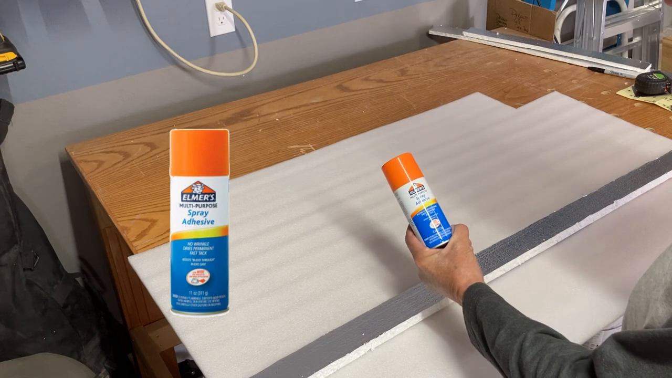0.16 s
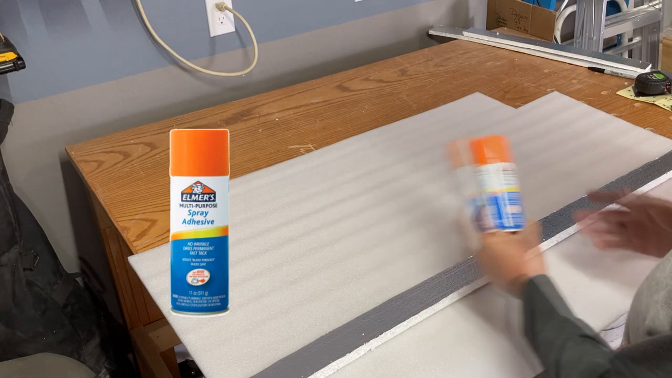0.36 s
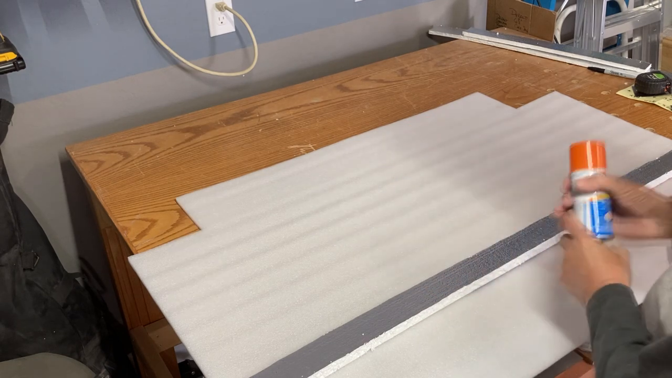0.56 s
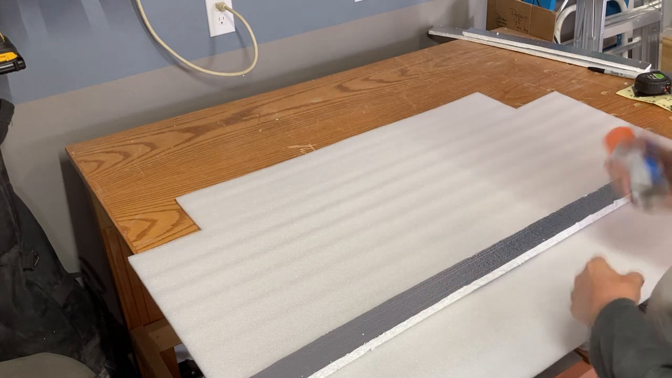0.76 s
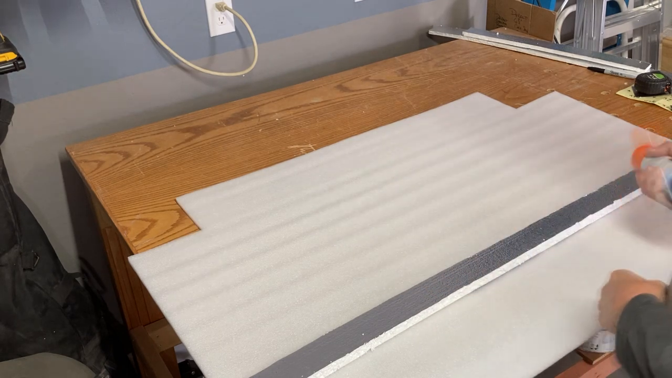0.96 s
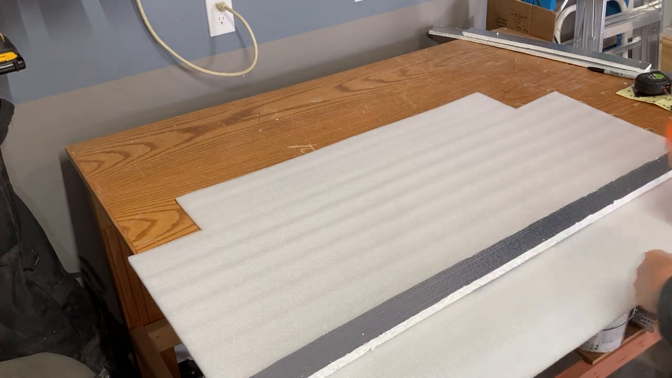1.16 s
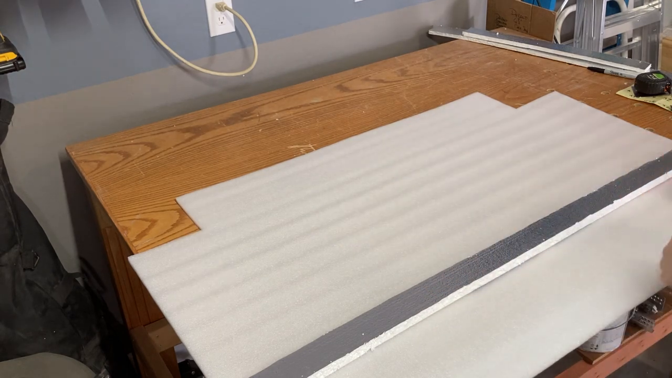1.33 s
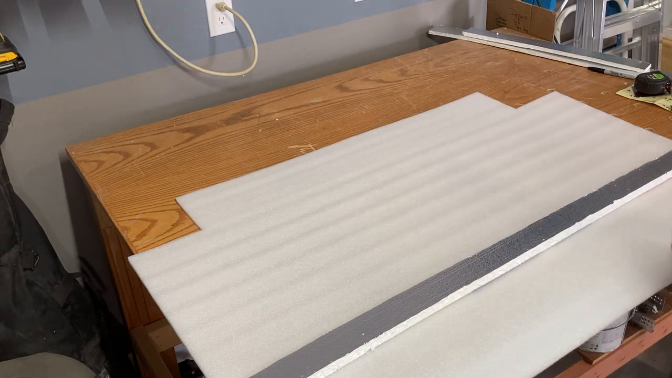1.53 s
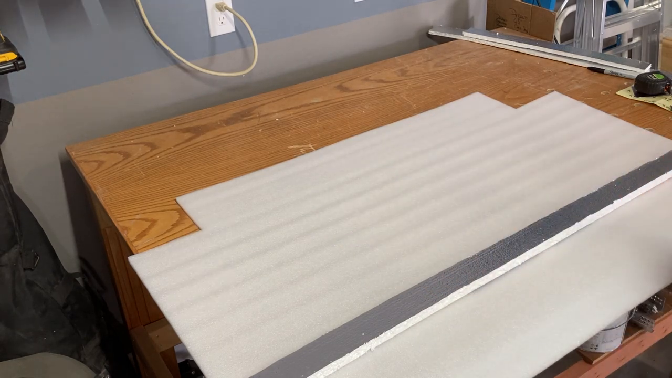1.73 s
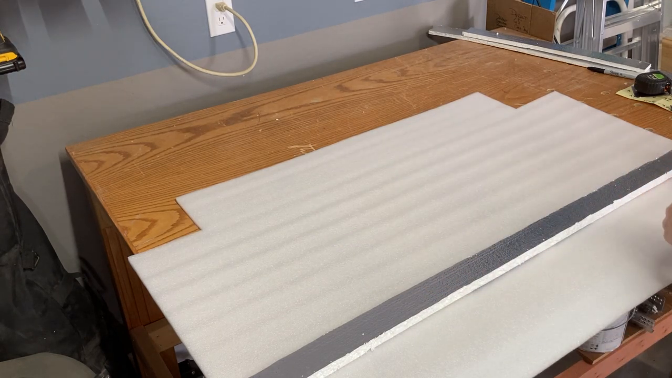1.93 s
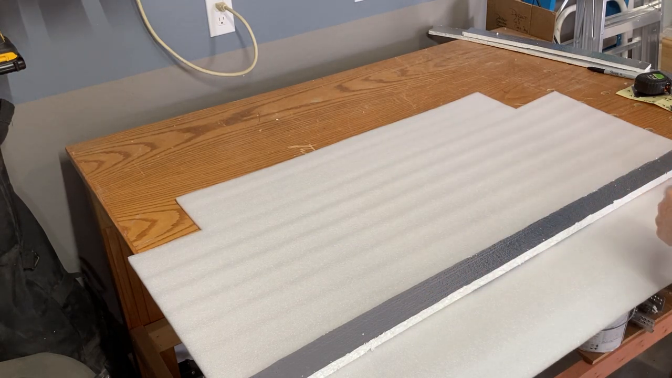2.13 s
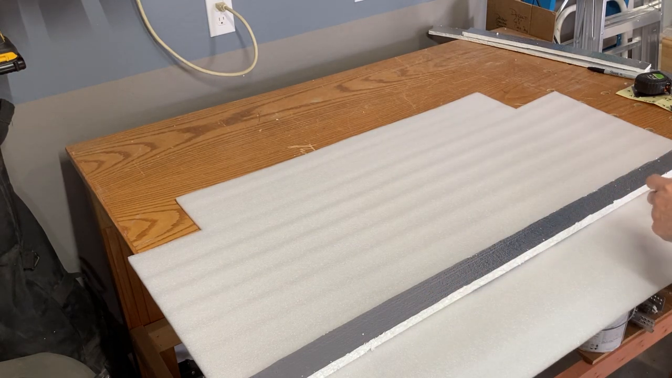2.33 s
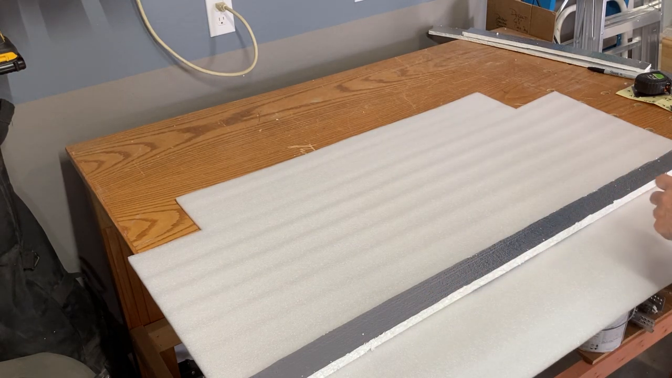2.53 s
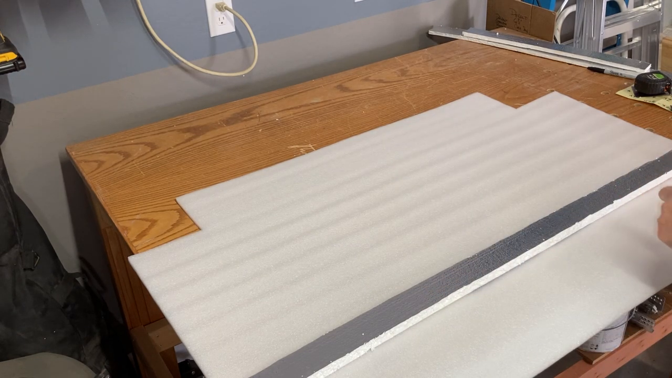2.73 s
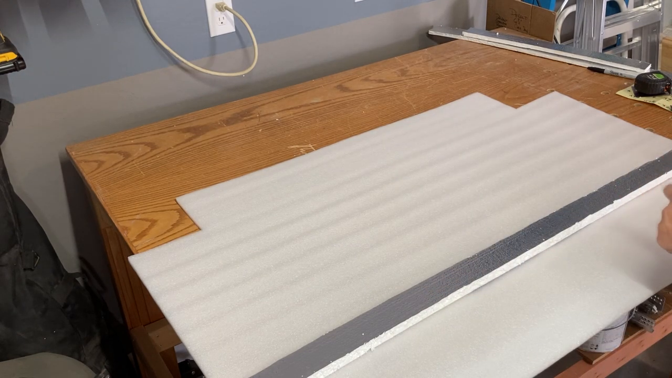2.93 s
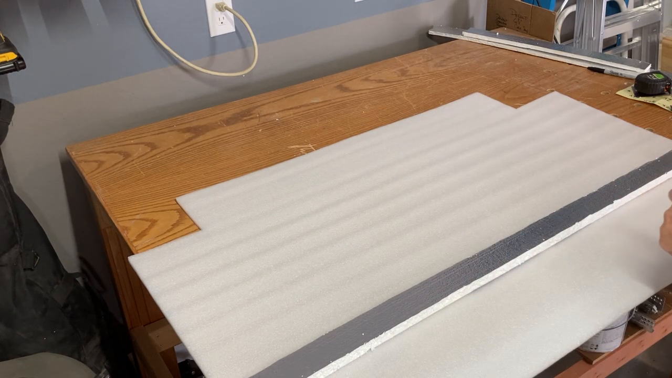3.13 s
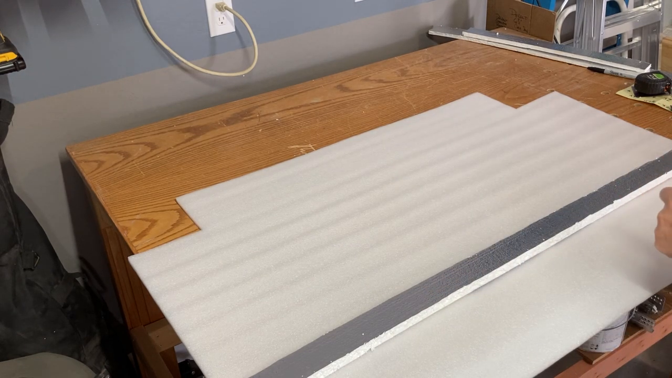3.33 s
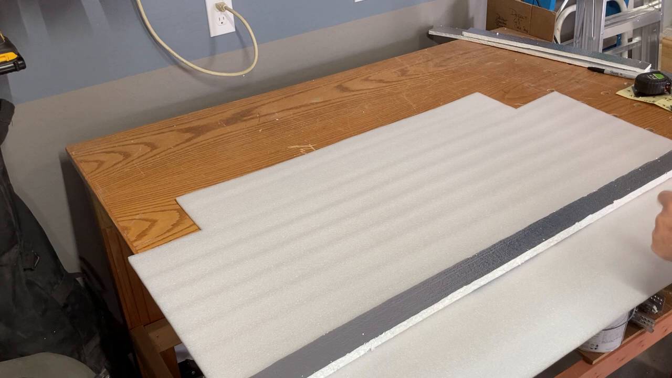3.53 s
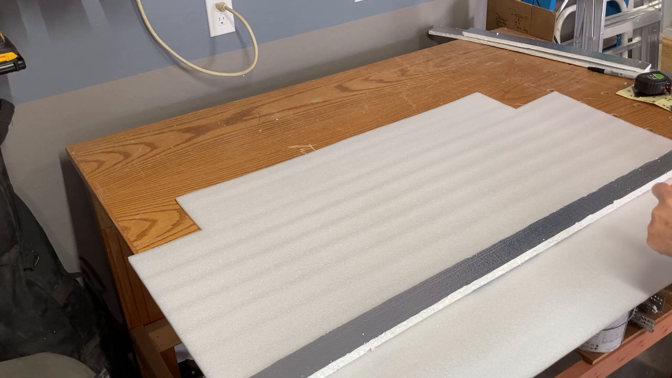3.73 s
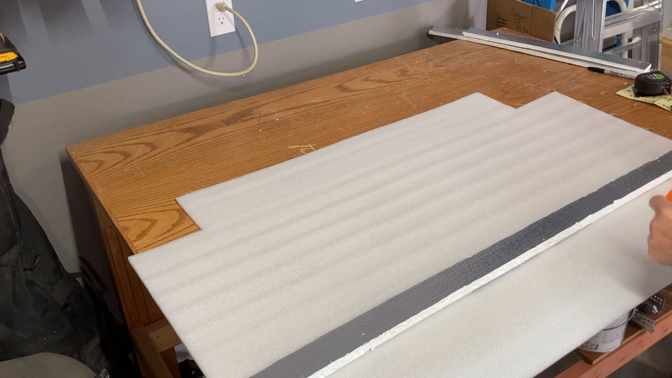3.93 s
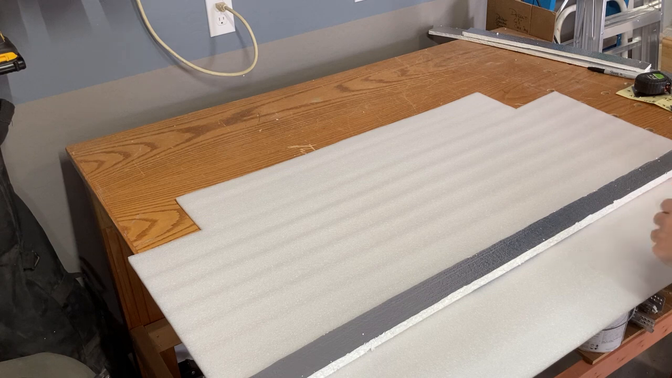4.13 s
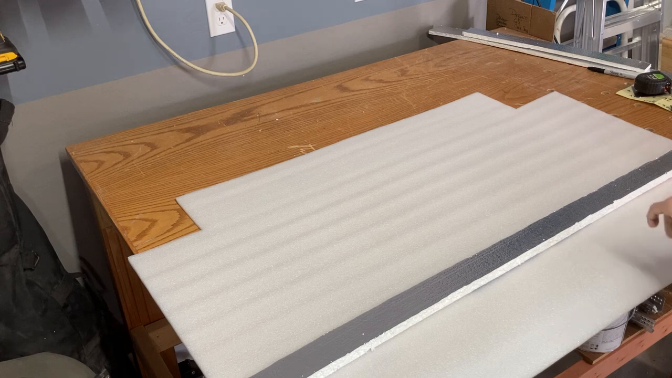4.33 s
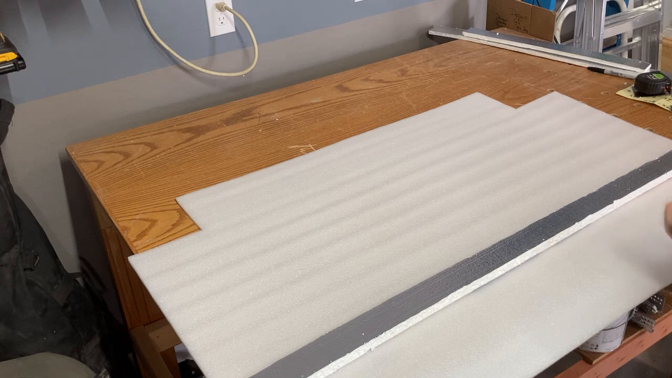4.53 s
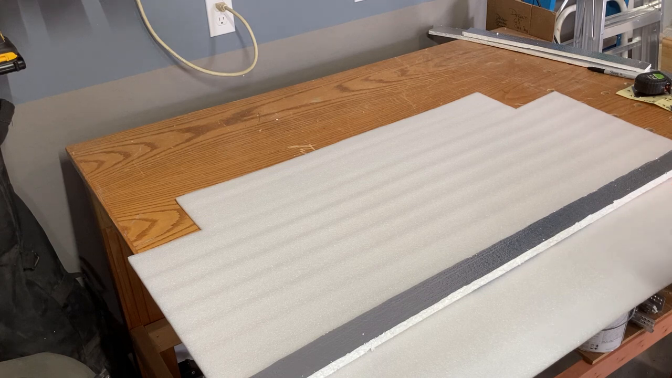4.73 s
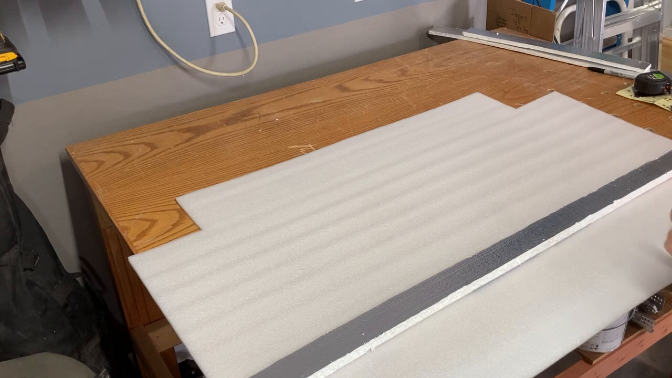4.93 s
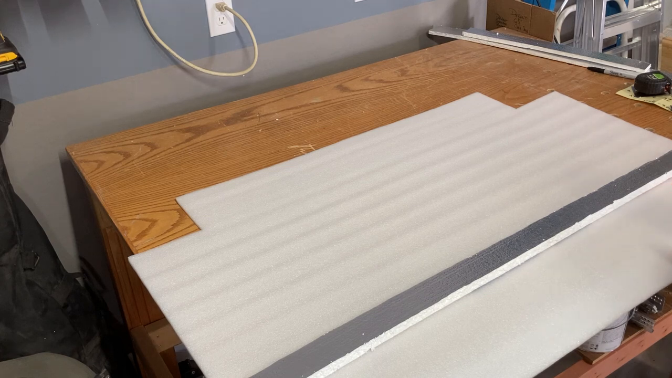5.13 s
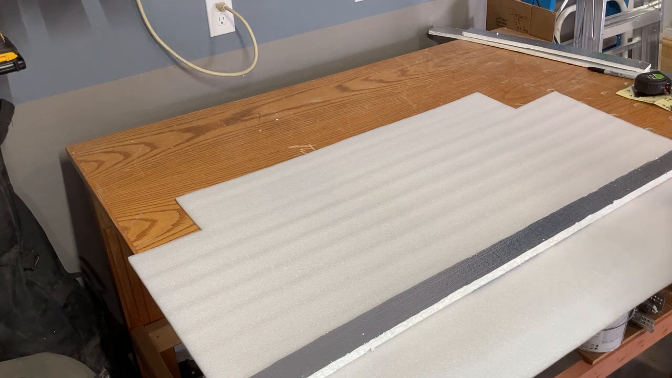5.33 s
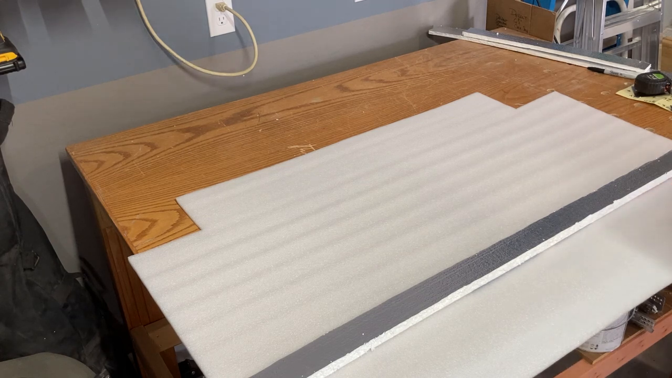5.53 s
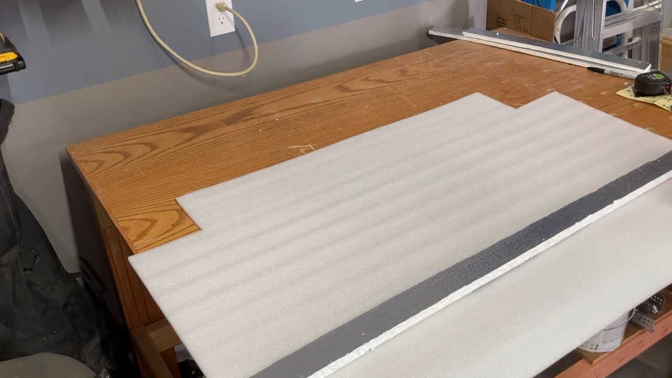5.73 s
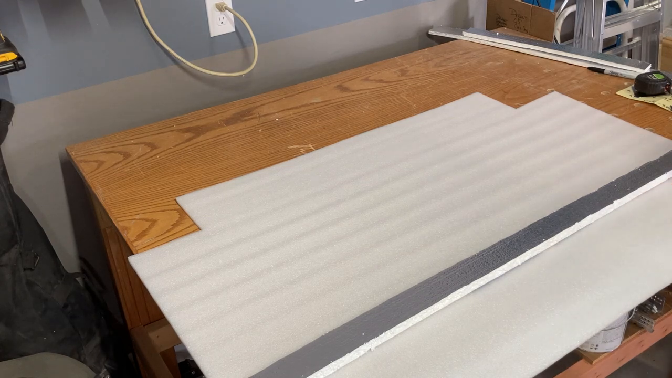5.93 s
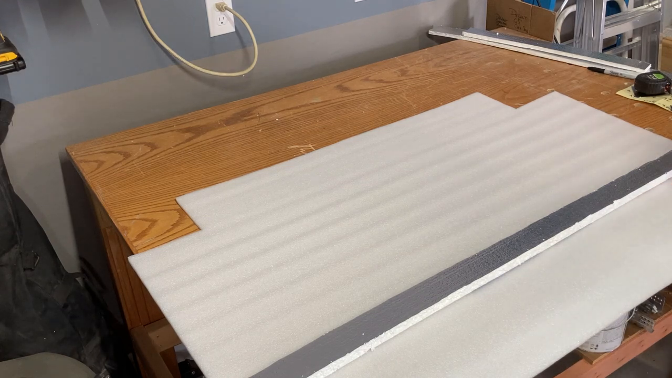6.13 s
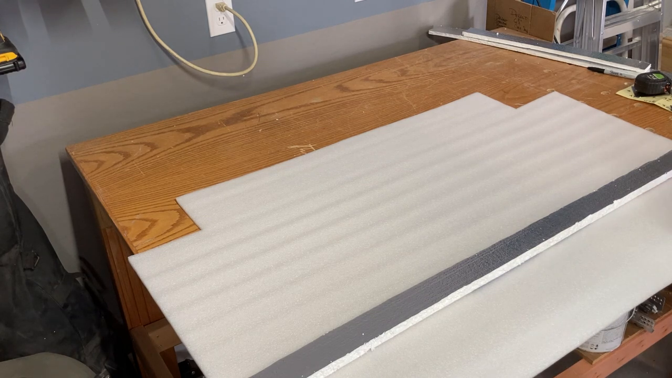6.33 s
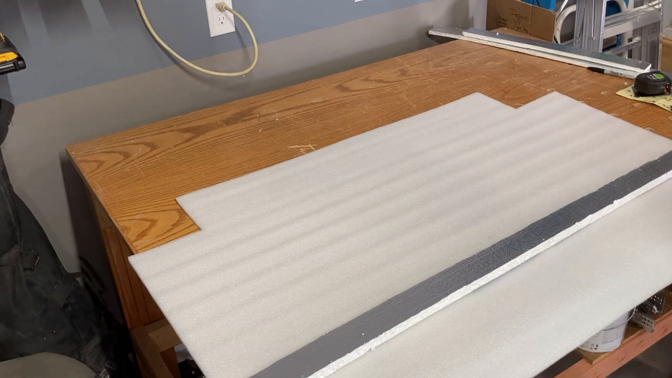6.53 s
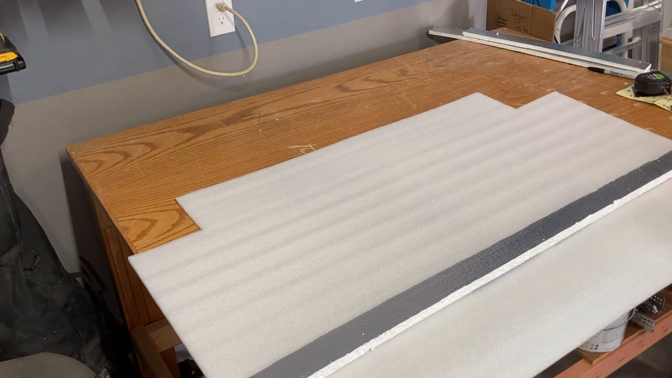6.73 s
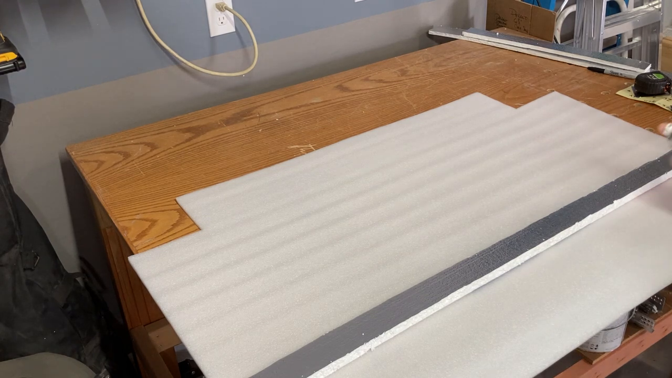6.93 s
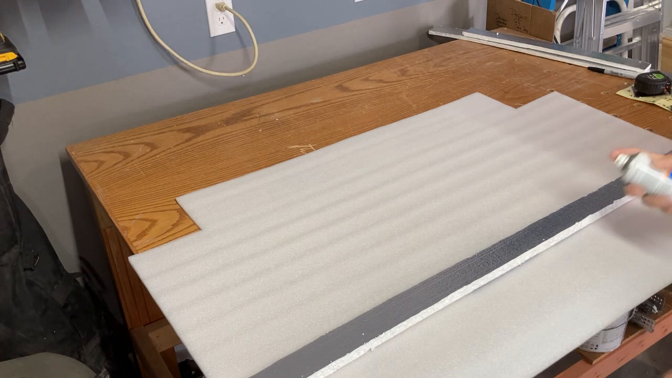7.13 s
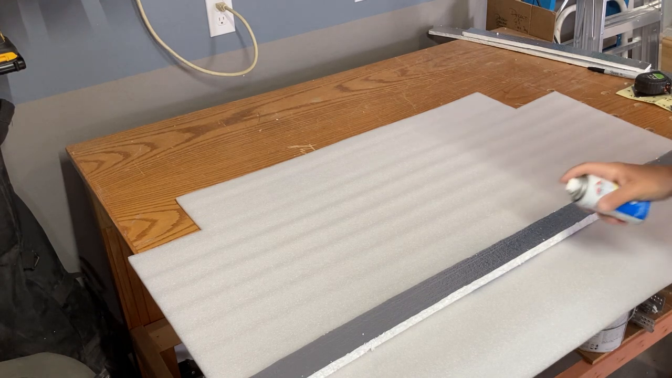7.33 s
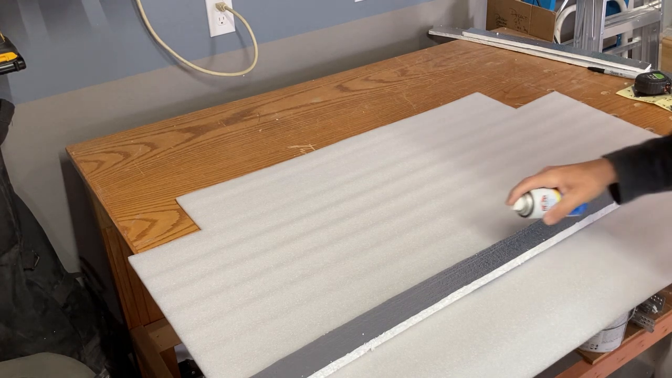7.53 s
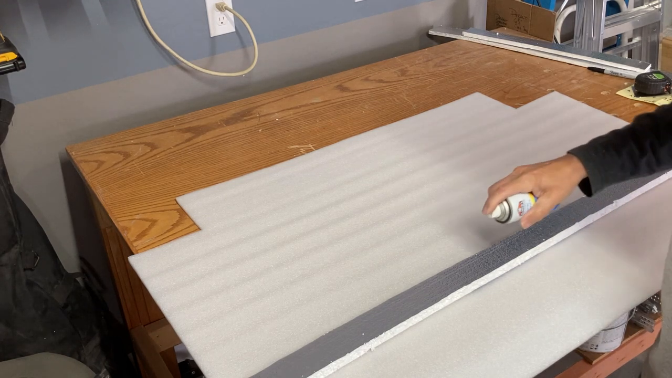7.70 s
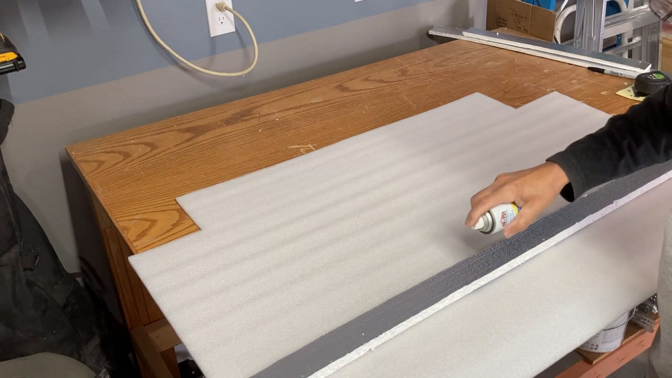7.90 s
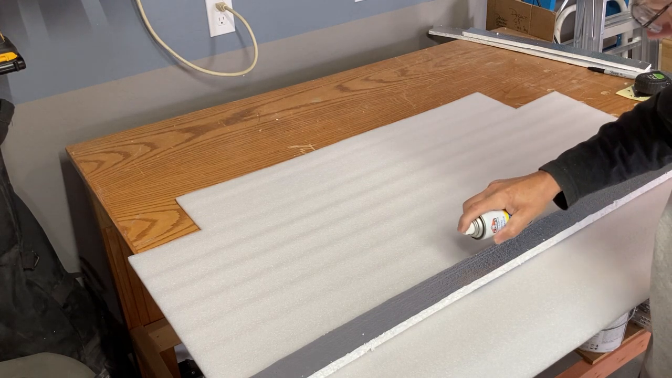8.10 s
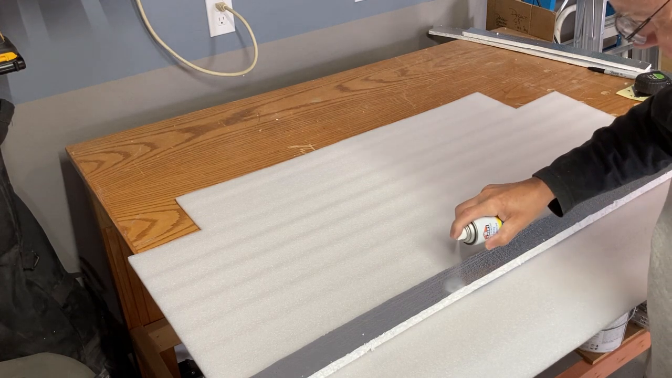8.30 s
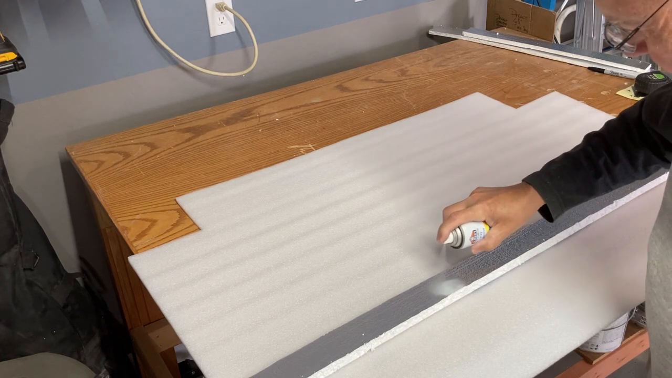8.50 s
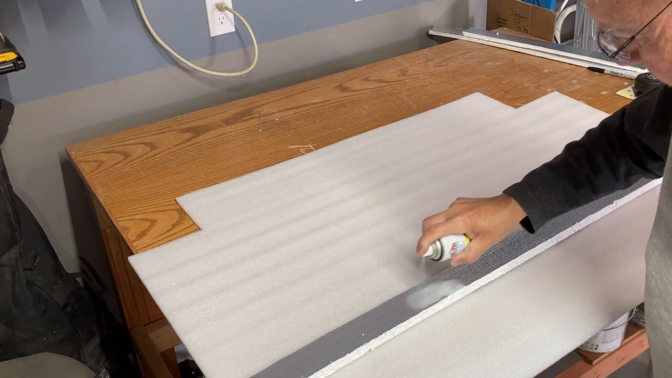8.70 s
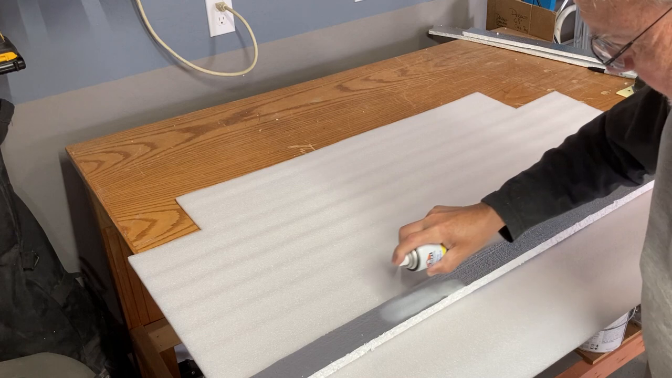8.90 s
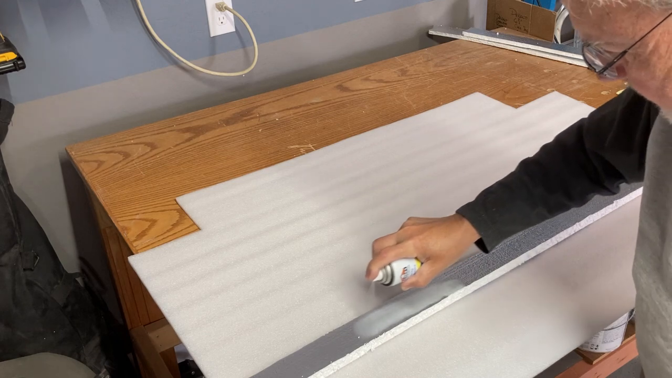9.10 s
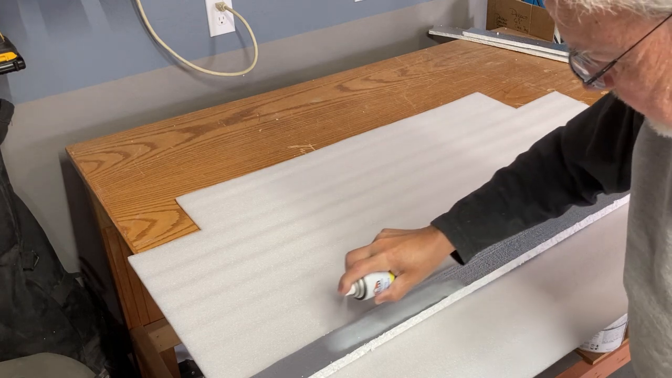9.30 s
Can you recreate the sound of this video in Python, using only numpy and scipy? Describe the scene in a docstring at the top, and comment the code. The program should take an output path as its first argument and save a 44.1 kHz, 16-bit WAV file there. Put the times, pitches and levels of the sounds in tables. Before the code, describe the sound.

A garage workshop with a low, quiet rumble and lively short reverberation. After a tiny rub at 0.5 s, a stiff plastic cap begins to crack at about 0.7 s: sharp, ringing, irregular snaps crowd together until 2.6 s, growing more hollow, with weaker ones at 2.9 and 3.2. From 3.2 to 4.6 come faint finger taps and short sleeve or skin rubs. At 4.76 a hollow thud lands on the bench. A scrape at 5.15 leads into another cluster of hard snaps, 5.1 to 5.8. At 6.0 a hollow plastic object knocks and rocks briefly; a faint low drone swells until about 7.5, with a very soft bump at 6.8. Light brushes follow at 7.4 and 8.0. At 8.15 the nozzle clicks, sputters briefly, then sprays a bright, steady, fine hiss with pattering droplets to the end, near 9.5 s.

```python
"""In a garage workshop the stiff plastic cap of an aerosol can is twisted and pried until it cracks free.
Plastic slips make the cracks and ring the cap; hollow knocks of things put down on the bench are dying modes.
Sleeves brush in friction noise, fingers tap, and glue is sprayed onto a foam sheet: a hissing jet with droplets.
A low noise rumble and a faint sine drone lie underneath."""
import sys
import numpy as np
from scipy import signal
from scipy.fft import rfft, irfft, next_fast_len
from scipy.io import wavfile

SR = 44100
rng = np.random.default_rng(int(sys.argv[2]) if len(sys.argv) > 2 else 0)


def master_out(mix):
    """Clip the mix to full scale and print it as 16-bit PCM to the path in sys.argv[1]."""
    frames = np.transpose(np.atleast_2d(mix))
    ceiling = np.clip(frames, -1, 1)
    pcm = np.round(ceiling * 32767).astype(np.int16)
    wavfile.write(sys.argv[1], SR, pcm)


N = 417186  # length in samples


def from_db(db):
    """Decibels to gain."""
    return 10 ** (np.asarray(db) / 20)


def rms_one(x):
    """Scale to rms 1."""
    return x / np.sqrt(np.mean(x ** 2) + 1e-20)


def in_time(rows):
    """The columns of a curve at every sample."""
    s, *columns = np.transpose(rows)
    return [np.interp(np.arange(N) / SR, s, c) for c in columns]


def at_hz(points, hz, axis=1):
    """Read one column of a table on a log-frequency axis."""
    points = np.array(points)
    return np.interp(np.log(np.maximum(hz, 1)), np.log(points[:, 0]), points[:, axis])


def band(x, low_hz, high_hz, order=2):
    """Causal band-pass."""
    edges_hz = [low_hz, min(high_hz, SR / 2 - 1)]
    return signal.sosfilt(signal.butter(order, edges_hz, "band", fs=SR, output="sos"), x)


def add(track, s, sound):
    """Mix a short sound in at a time in seconds."""
    at = round(s * SR)
    track[at:at + len(sound)] += sound[:N - at]


def drift(rate):
    """Smooth random wander, rms 1, with this many knots per second."""
    knots = rng.standard_normal(int(rate * N / SR) + 2)
    return rms_one(np.interp(np.arange(N) * rate / SR, np.arange(len(knots)), knots))


def coloured(x, colour):
    """Give a noise its spectrum; rms 1."""
    size = next_fast_len(N)
    gain = from_db(at_hz(colour, np.fft.rfftfreq(size, 1 / SR)))
    return rms_one(irfft(rfft(x, size) * gain, size)[..., :N])


def grains(per_s, spread_db):
    """Tiny random impacts of uneven size and either sign."""
    sizes = from_db(spread_db * np.minimum(rng.exponential(1, N), 4)) * rng.choice([-1, 1], N)
    return rms_one(sizes * (rng.random(N) < per_s / SR))


def late(x, ms):
    """Read a signal some milliseconds late."""
    return np.interp(np.arange(N) - ms * SR / 10 ** 3, np.arange(N), x)


def decay(t, t60):
    """Exponential fade that loses 60 dB in t60 seconds."""
    return np.exp(-np.log(1000) * t / t60)


def ring(t, hz, t60):
    """A dying sine."""
    return np.sin(2 * np.pi * hz * t) * decay(t, t60)


def burst(x, db):
    """Scale a click to the energy of one millisecond at this level."""
    return from_db(db) * x / np.sqrt(np.sum(x ** 2) * 10 ** 3 / SR)


def snaps(crack_t60=.007, edge_db=-7, chatter_db=-12, chatter_t60=0.16, cavity_hz=1140, count=4):
    """Each slip cracks, rings the shell and the air in the cap, and trails a second slip and many tiny ones.
    Returns the direct sound and one room feed for each of a few hand positions."""
    # plastic snaps of the cap over the can's rim, the nozzle last; levels before direct and room gains:
    # start_s [s], shell_hz [Hz], shell_db [dB], crack_db [dB]
    plastic_snaps = [(0.719, 2130, -23, -27.5), (0.809, 1630, -28, -36.5), (0.898, 1810, -23, -33),
                     (0.9403, 1840, -21.5, -29), (0.981, 1920, -23.5, -34.5), (1.0328, 1530, -21, -15.5),
                     (1.211, 1715, -20.5, -27.5), (1.4108, 1920, -17, -25.5), (1.501, 2000, -18.5, -24),
                     (1.6166, 1350, -23.5, -23), (1.6496, 1670, -22, -35), (1.6985, 2200, -11.5, -26),
                     (1.7447, 2140, -31, -25), (1.8475, 2060, -16.5, -16.5), (1.907, 1940, -18, -25),
                     (1.9488, 2200, -16, -27.5), (2.0447, 2140, -13, -17), (2.1695, 1300, -23.5, -28),
                     (2.2403, 1830, -19, -15), (2.3303, 1930, -21.5, -22.5), (2.3797, 1980, -19.5, -26),
                     (2.4703, 1890, -20.5, -16), (2.579, 1424, -27.5, -33.5), (2.892, 1860, -29.5, -41.5),
                     (3.206, 1740, -36, -45), (5.133, 2200, -27, -36.5), (5.2128, 2170, -15.5, -14.5),
                     (5.296, 2040, -16, -30), (5.3017, 1970, -21, -41), (5.4657, 1920, -23.5, -16),
                     (5.553, 1730, -23.5, -28.5), (5.823, 2090, -31, -45), (8.1447, 2200, -28, -37),
                     (8.204, 1800, -38, -40)]
    # how hollow the cap sounds as the grip changes: time_s [s], cavity_db [dB relative to the shell]
    hollowness = [(.7, -16), (1.5, -13.5), (2.3, -6), (3.2, -4.5), (5.25, -18), (5.5, -6.5), (5.8, -10),
                  (8.1, -17.5)]
    # how squarely the can faces the microphone: time_s [s], facing_db [dB]
    facing = [(.9, 0.5), (1.3, 1.5), (1.95, 2.5), (2.3, -.5), (2.9, -1.5), (5.45, -1.5), (8.1, 5)]
    shell_t60 = .012  # s
    after_slip_s, after_slip_db = .014, -12  # mean delay and level of the weaker second slip
    sizzle_per_crack = 0.88  # dB of sizzle per dB of crack: a harder snap gains more in crack
    lead_s, lead_db = .005, -14.5  # the plastic gives a little just before it lets go; level re the crack
    direct_db, room_db = -2, 2.32

    direct, to_room = np.zeros(N), np.zeros((count, N))
    t = np.arange(SR // 10) / SR
    for k, (s, hz, shell_db, crack_db) in enumerate(plastic_snaps):
        tear, again, tiny, strain = rng.standard_normal((4, len(t)))
        since = t - after_slip_s * rng.uniform(.5, 1.5)
        edge = burst(1.0 * (t == 0), edge_db)
        crack = burst(tear * decay(t, crack_t60), 0)
        after = burst(again * (since > 0) * decay(np.abs(since), crack_t60), after_slip_db)
        # the fifth power leaves a few sparse peaks
        chatter = burst(tiny ** 5 * decay(t, chatter_t60), 0)
        slip = edge + crack + after + from_db(chatter_db) * chatter

        shell = burst(band(ring(t, hz, shell_t60), hz / 1.2, hz * 2.8, order=1), db=1.85)
        shell = shell + burst(band(slip, hz / 1.218, hz * 1.248), db=1.5)
        cavity = burst(ring(t, cavity_hz, 0.054), 0) + burst(band(slip, 560, 1100, order=3), db=-6.0)
        cap = shell + burst(cavity, np.interp(s, *np.transpose(hollowness)))
        sizzle = burst(band(slip, 6675, 11280, order=3), 0) + burst(band(slip, 12500, 16500), db=-13.5)
        snap = burst(cap, shell_db) - burst(band(slip, 3000, 5300), crack_db)
        snap = snap + burst(sizzle, crack_db * sizzle_per_crack)
        lead = burst(band(strain * decay(t, .03), 1600, 11000), crack_db + lead_db)

        # facing the microphone lifts the direct sound and lowers the room by half as many dB
        facing_db = np.interp(s, *np.transpose(facing))
        for at, sound in (s - lead_s, lead), (s, snap):
            add(direct, at, sound * from_db(direct_db + facing_db))
            add(to_room[k % count], at, sound * from_db(room_db - facing_db / 2))
    return direct, to_room


def spray(flutter_db=1.0, spit_s=0.0039, jet_db=4.5, splatter_db=-14.5):
    """A turbulent jet and droplets pattering on the foam, all combed by an echo off the sheet."""
    # strength of the open jet as the can moves along the sheet: time_s [s], strength_db [dB]
    strength = [(8.29, -38.5), (8.58, -37), (8.7, -39.5), (9.15, -40), (9.45, -36.5)]
    # the echo off the sheet comes later as the can moves: time_s [s], delay_ms [ms]
    sheet_echo = [(8.2, 0.39), (8.7, 0.41), (9.0, 0.41), (9.25, 0.42), (9.46, 0.43)]
    # spectrum of the jet: pitch_hz [Hz], level_db [relative dB per Hz]
    jet_colour = [(2500, -35), (4000, -19.5), (5000, -6.5), (6100, -7.5), (7300, -5), (8600, 1.5),
                  (10000, 0.5), (13000, 1.5), (16000, -3.5)]
    # spectrum of the droplets: pitch_hz [Hz], level_db [relative dB per Hz]
    splatter_colour = [(300, -17), (700, -13.5), (1200, -3.5), (2000, 1), (3000, 0.5), (4000, 0.5),
                       (6000, -6.5), (10000, -25)]
    # the nozzle spits as the jet gets going: time_s [s], splatter_gain_db [dB]
    spits = [(8.277, 14.5), (8.324, 14.5), (8.359, 9.5)]
    # the valve first opens part way, then fully
    valve_s, full_open_s, opening_s = 8.146, 8.28, 0.046
    throttled_jet_db, throttled_splatter_db = -8, -2
    sheet_echo_gain = .3

    t = np.arange(N) / SR
    strength_db, = in_time(strength)
    throttled = np.clip((full_open_s - t) / opening_s, 0, 1)
    spits_db = sum(db * np.exp(-((t - s) / spit_s) ** 2) for s, db in spits)
    flow = np.clip((t - valve_s) / 0.0077, 0, 1) * from_db(strength_db + flutter_db * drift(120))
    jet = coloured(rng.standard_normal(N), jet_colour) * from_db(jet_db + throttled_jet_db * throttled)
    droplets = coloured(grains(per_s=9000, spread_db=3.0), splatter_colour)
    droplets = droplets * from_db(splatter_db + throttled_splatter_db * throttled + spits_db)
    hiss = flow * (jet + droplets)
    return hiss + sheet_echo_gain * late(hiss, *in_time(sheet_echo))


def knocks(count=8):
    """A rim lands and rocks: the cap's cavity rings, the bench booms and thuds, the wall clacks, the edge ticks."""
    # things put down on the bench: start_s [s], rocking_s [s], cavity_hz [Hz],
    # ring_db, boom_db, thud_db, clack_db, tick_db [all dB, for the first contact]
    landings = [(4.7595, .01, 1176, -24.5, -26.5, -22, -45.5, -29),
                (6.002, .066, 1098, -17.5, -47.5, -28.5, -25.5, -46.5),
                (6.799, .004, 1100, -72, -41.5, -49.5, -53, -68.5)]
    # modes of the hollow cap: multiple [of the cavity pitch], level_db [relative dB], t60 [s]
    cap_modes = [(.855, -27, .05), (1.002, 0, 0.053), (1.12, -5, 0.029)]
    # modes of the bench top: pitch_hz [Hz], level_db [relative dB], t60 [s]
    bench_modes = [(66, -35, .2), (119, -16, 0.22), (178.2, -27, 0.21), (500, -22.5, 0.026),
                   (980, -19.5, .06)]
    # a rim rocks until the hand has steadied it: nominal first gap, growth of each next gap, loss per contact
    rock_gap_s, rock_slowing, rock_loss_db = .0056, 1.3, 3.5

    out, t = np.zeros(N), np.arange(SR // 2) / SR
    gaps_s = rock_gap_s * rock_slowing ** np.arange(count) * rng.uniform(.85, 1.3, count)
    contacts_s = np.append(0, np.cumsum(gaps_s))
    for s, rocking_s, cavity_hz, ring_db, boom_db, thud_db, clack_db, tick_db in landings:
        scuffs = rng.standard_normal((len(contacts_s), len(t))) * decay(t, 0.012)
        cap = sum(from_db(db) * ring(t, multiple * cavity_hz, t60) for multiple, db, t60 in cap_modes)
        top = sum(from_db(db) * ring(t, hz, t60) for hz, db, t60 in bench_modes)
        for k, delay_s in enumerate(contacts_s[contacts_s < rocking_s]):
            blow = burst(1.0 * (t == 0), 0) + burst(scuffs[k], db=-5)
            bench = top + burst(band(blow, 130, 280), db=-7.0)
            thud = burst(band(blow, 250, 1120, order=5), db=-4.5)
            thud = thud + burst(band(blow, 900, 1400, order=3), db=-0.5)
            body = from_db(ring_db) * band(cap, 800, 1200) + from_db(boom_db) * bench + from_db(thud_db) * thud
            edge = burst(band(blow, 1600, 2700), clack_db) - burst(band(blow, 2800, 11000), tick_db)
            add(out, s + delay_s, from_db(-rock_loss_db * k) * (body + edge))
    return out


def rubs(rise_s=0.007, fall_s=0.019, uneven_db=2.7, resonance_gain=0.44):
    """Skin and cloth slide in short strokes of dense friction grains; the rubbed thing adds a resonance."""
    # hands and sleeves brush: start_s [s], length_s [s], resonance_hz [Hz], rub_db [dB], swish_db [dB]
    strokes = [(0.54, 0.026, 2200, -59.5, -52.5), (3.247, 0.13, 1940, -61, -69.5),
               (3.5, 0.093, 1990, -64, -65.5), (3.962, 0.06, 1500, -72, -69.5),
               (4.18, 0.1, 1350, -59.5, -63), (4.371, .07, 1300, -62.5, -69.5),
               (4.567, 0.039, 1140, -65.5, -63), (5.03, 0.12, 2200, -63.5, -77.5),
               (5.15, 0.092, 2490, -47.5, -62.5), (5.87, .12, 2080, -54.5, -62),
               (6.497, 0.04, 2420, -65, -72), (7.393, 0.096, 634, -59, -57.5), (7.85, .074, 1800, -74, -73),
               (8.024, 0.071, 1900, -56.5, -64.5)]
    # spectrum of the rub: pitch_hz [Hz], level_db [relative dB per Hz]
    rub_colour = [(150, -7.5), (400, -2.5), (750, -9.5), (1200, -5.5), (2000, 6.5), (3200, 3), (5000, -6.5),
                  (9000, -24.5)]
    # spectrum of the swish: pitch_hz [Hz], level_db [relative dB per Hz]
    swish_colour = [(2500, -16), (5000, -11.5), (7500, 5), (10500, 6.5), (13000, -7.5), (16000, -13)]

    out, t = np.zeros(N), np.arange(SR // 2) / SR
    friction = grains(per_s=6000, spread_db=2.0) * from_db(uneven_db * drift(60))
    rub, swish = coloured(friction, rub_colour), coloured(friction, swish_colour)
    for s, length_s, hz, rub_db, swish_db in strokes:
        now = round(s * SR) + np.arange(len(t))
        envelope = (1 - np.exp(-t / rise_s)) * np.exp(-np.maximum(t - length_s, 0) / fall_s)
        resonance = rms_one(band(friction[now], hz / 1.15, hz * 1.15, order=1))
        body = 1.1 * rub[now] + resonance_gain * resonance
        add(out, s, envelope * (from_db(rub_db) * body + from_db(swish_db) * swish[now]))
    return out


def taps(tick_db=-5, uneven_db=0.5, count=8):
    """In each shift of grip fingertips land at uneven gaps; each nudges two modes of the cap, and the nail ticks."""
    # the fingers shift their grip on the plastic: start_s [s], length_s [s], level_db [mean dB of a tap's modes]
    grips = [(0.548, .02, -51), (3.345, .02, -46), (3.501, .02, -43.5), (4.187, .12, -45),
             (4.398, .04, -52), (4.587, .02, -44.5), (5.906, .09, -46.5)]

    out, t = np.zeros(N), np.arange(SR // 20) / SR
    cap = ring(t, 1170, .018) + ring(t, 1950, .015)
    for s, length_s, db in grips:
        gaps_s = rng.uniform(.0245, .0392, count)
        delays_s = np.append(0, np.cumsum(gaps_s))
        levels_db = db + uneven_db * rng.standard_normal(len(delays_s))
        nails = rng.standard_normal((len(delays_s), len(t))) * decay(t, .015)
        nails = band(nails, 2500, 10000)
        for delay_s, level_db, nail in zip(delays_s[delays_s < length_s], levels_db, nails):
            add(out, s + delay_s, burst(cap, level_db) + burst(nail, level_db + tick_db))
    return out


def background(side_db=-13):
    """Low rumble of coloured noise, mostly alike at both ears, with a wavering sine drone that sinks in pitch."""
    # spectrum of the rumble: pitch_hz [Hz], level_db [relative dB per Hz]
    floor_colour = [(20, -11), (32, -10.5), (48, 2.5), (65, 4.5), (90, -1), (130, -1.5), (200, -6),
                    (300, -10), (500, -18), (1000, -29.5), (3000, -39), (8000, -39.5), (16000, -42.5)]
    # the drone swells for a while and fades: time_s [s], level_db [dB rms, before the waver]
    drone_level = [(0, -76), (5.3, -79), (5.9, -67), (7.2, -68.5), (7.6, -87.5)]
    floor_db = -64
    drone_hz, sag_hz_per_s = 299, 2.1

    mid, side = coloured(rng.standard_normal((2, N)), floor_colour)
    side = from_db(side_db) * side + 0.49 * band(side, 700, 16000)
    drone_db, = in_time(drone_level)
    hz = drone_hz - sag_hz_per_s * np.arange(N) / SR + 0.98 * drift(25)
    drone = np.sqrt(2) * np.sin(2 * np.pi * np.cumsum(hz) / SR) * from_db(drone_db + 2 * drift(14))
    return from_db(floor_db) * (mid + side * [[1], [-1]]) + drone


def garage(x, bench_ms=6.2, bench_gain=0.32, early_db=-6.0, early_t60=0.18, tail_db=-3.5, alike_hz=560):
    """One clear echo off the bench, a quick scatter off the clutter, then a tail; its bass is alike at both ears."""
    # the garage's reverberation: pitch_hz [Hz], tail_t60 [s], level_db [dB on scatter and tail]
    reverberation = [(100, .6, 4.5), (424, 0.81, 6), (1100, 0.71, 2.5), (2200, 0.8, 0), (3890, .62, 3),
                     (6560, 0.48, -1.5), (11000, 0.59, -8), (17700, 0.2, -2)]

    t = np.arange(3 * SR // 4) / SR
    white, edges_hz = rng.standard_normal((2, 2, len(t))), np.geomspace(50, 18000, 18)
    response = 0
    for k, (low, high) in enumerate(zip(edges_hz, edges_hz[1:])):
        hz = np.sqrt(low * high)
        power = 0
        for db, t60 in (early_db, early_t60), (tail_db, at_hz(reverberation, hz)):
            rate = np.log(10 ** 6) / t60
            power = power + from_db(db) ** 2 * rate / SR * np.exp(-rate * t)
        alike = 1 / (1 + (hz / alike_hz) ** 2)
        # neighbouring bands take turns between two noises
        mid, side = band(white[k % 2], low, high)
        ears = np.sqrt((1 + alike) / 2) * mid + np.sqrt((1 - alike) / 2) * side * [[1], [-1]]
        response = response + ears * np.sqrt(power) * from_db(at_hz(reverberation, hz, axis=2))
    response = response * np.clip(t / 0.0019 - .3, 0, 1)
    echo = bench_gain * np.array([late(x, bench_ms + 0.12), late(x, bench_ms)])
    return signal.fftconvolve(x[None], response, axes=1)[:, :N] + echo


def scene(side_lag_ms=0.15, knock_room_db=0.46, spray_room_db=-1.0):
    """Handling reaches the left later but stronger, with a reverb per hand position; the spray is straight ahead."""
    snap_direct, snap_room = snaps()
    knock, touch, hiss = knocks(), rubs() + taps(), spray()
    right = snap_direct + from_db(-1.0) * knock + from_db(-1.5) * touch
    left = from_db(3.0) * late(right, side_lag_ms)
    direct = np.array([left, right]) + from_db(-2.0) * hiss
    feeds = [*snap_room, from_db(knock_room_db) * knock + touch + from_db(spray_room_db) * hiss]
    return direct + sum(garage(feed) for feed in feeds) + background()


def record(dry, join_hz=6400):
    """In the treble both channels carry mostly one signal, late and inverted on the left; the top is cut."""
    shared, lag_s, cutoff_hz = .93, .000222, 15800
    size = next_fast_len(N + SR // 10)
    hz = np.fft.rfftfreq(size, 1 / SR)
    left, right = rfft(dry, size)
    share = shared * (1 + np.tanh((hz - join_hz) / 700)) / 2
    lagged = right * np.exp(-2j * np.pi * hz * lag_s)
    left = np.sqrt(1 - share) * left - np.sqrt(share) * lagged
    steep = signal.ellip(10, .1, 70, cutoff_hz, fs=SR, output="sos")
    return signal.sosfilt(steep, irfft(np.array([left, right]), size)[:, :N])


dry = scene()
out = record(dry)
master_out(out)
```